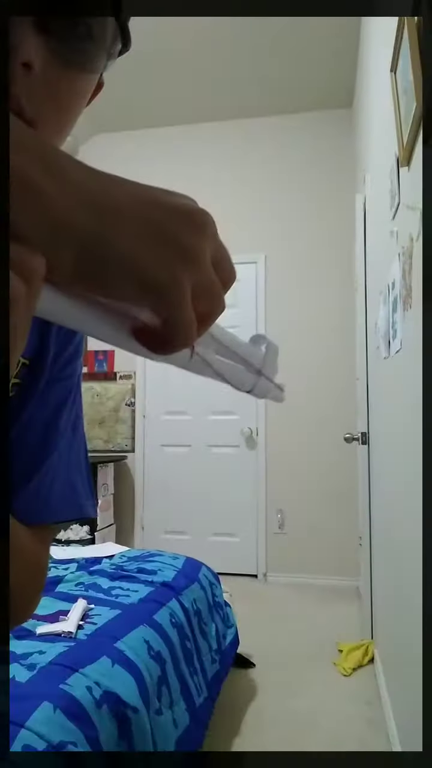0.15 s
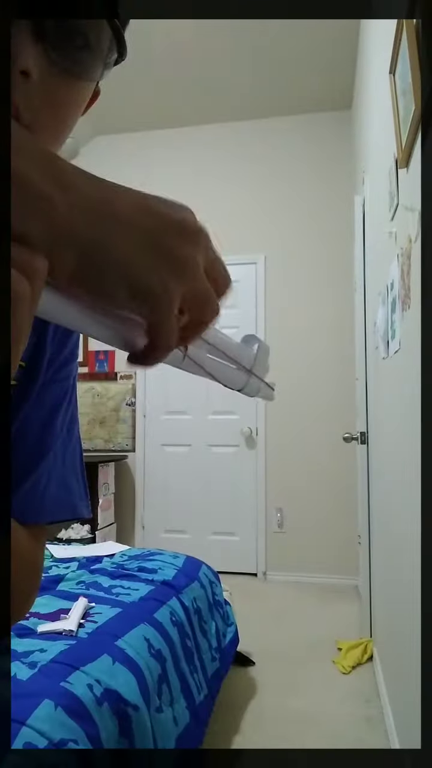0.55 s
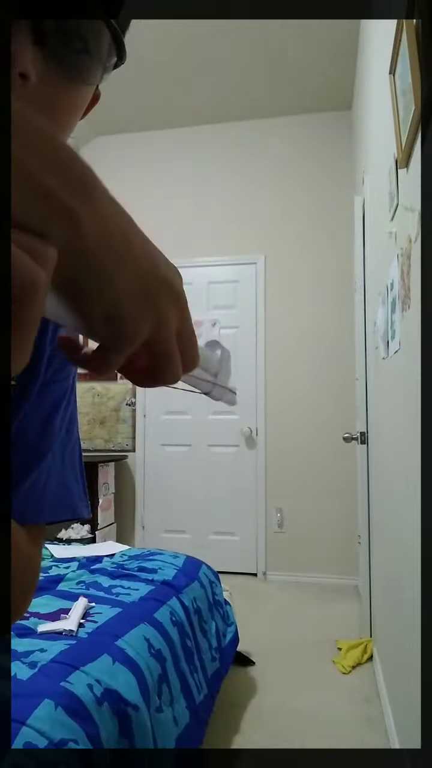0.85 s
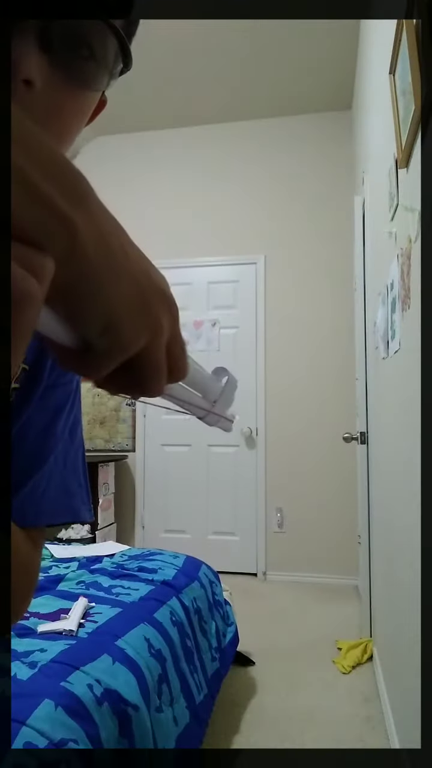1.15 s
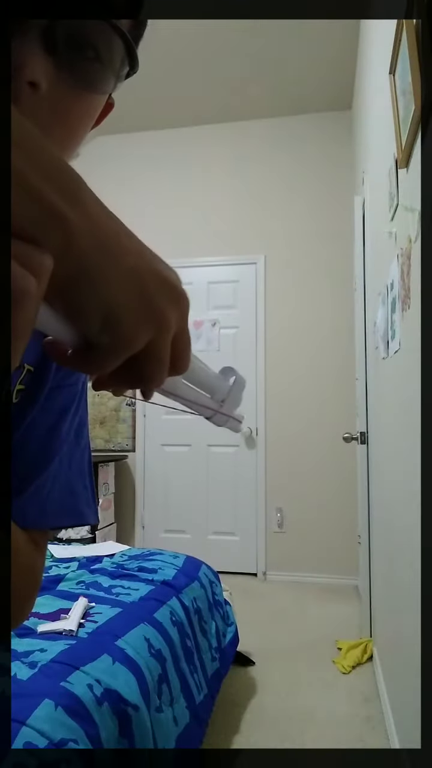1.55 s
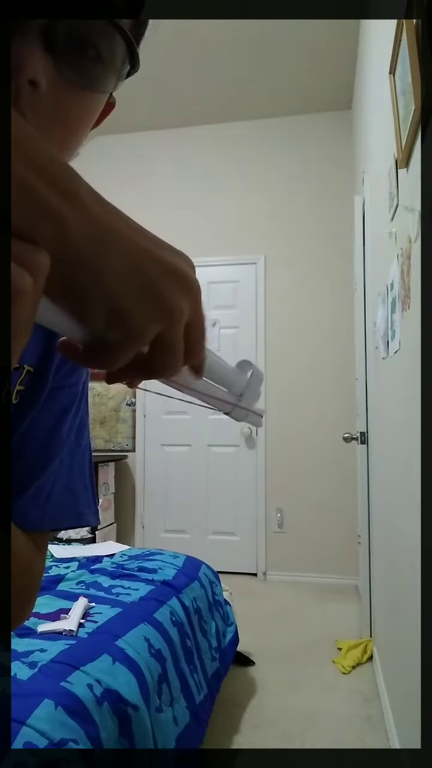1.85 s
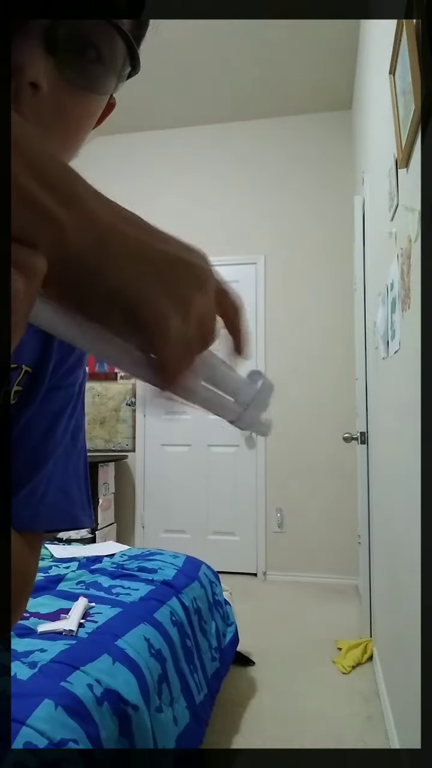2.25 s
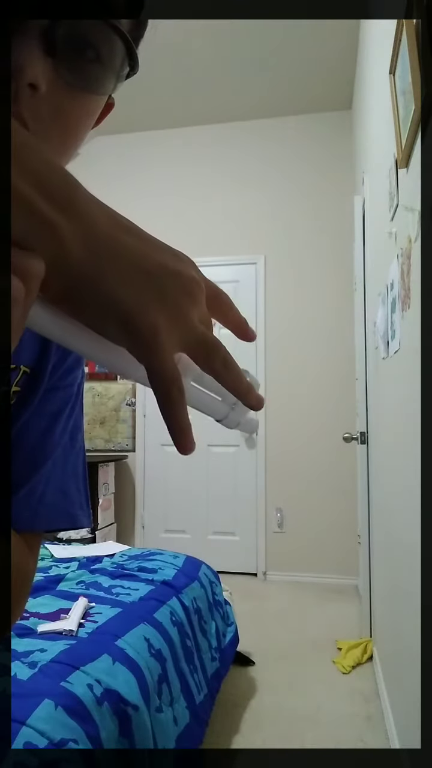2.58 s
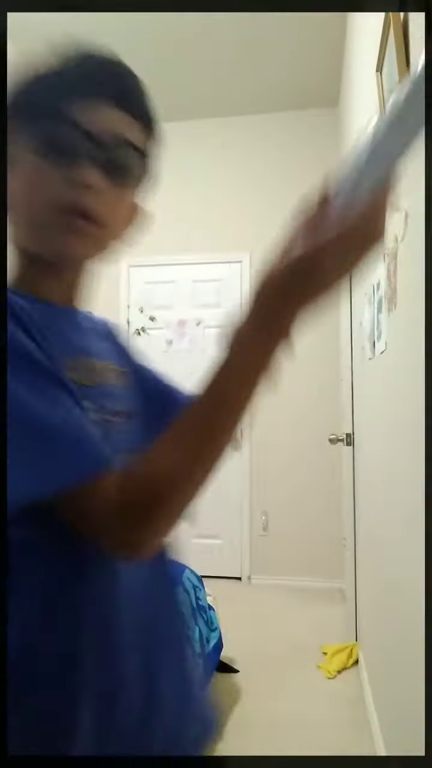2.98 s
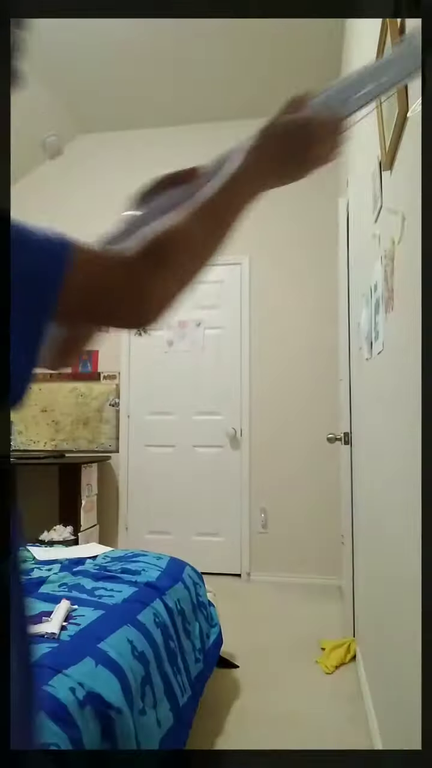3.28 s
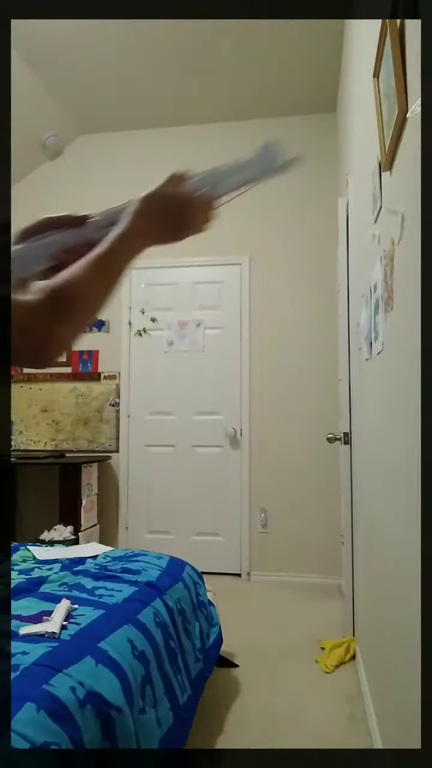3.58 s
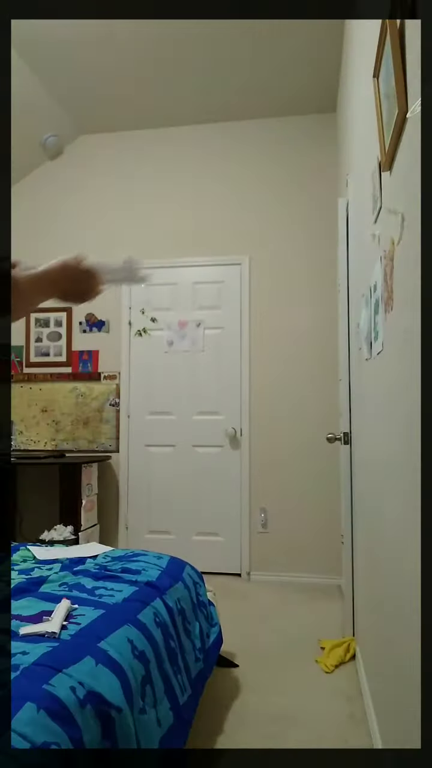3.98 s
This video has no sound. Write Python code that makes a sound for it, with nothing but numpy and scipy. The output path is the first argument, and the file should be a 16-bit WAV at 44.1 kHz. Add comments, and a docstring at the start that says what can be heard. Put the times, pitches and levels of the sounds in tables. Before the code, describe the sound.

Light paper clicks over a low electrical hum, then one sharp loud snap, a faint low twang, and a dull hollow thud.

```python
"""Paper rubber band gun in a humming bedroom

A rolled-paper gun is handled close to a phone while an appliance hums (sine, weak overtones) over rumble and air
(filtered noise). Paper rustles (clumped noise grains) and fingers tick the tube (noise crack, ringing modes).
The band is released with a snap (the loudest ticks); a band twangs (sinking near sine); something knocks
a hollow surface with a dull thud (low ringing modes); more paper ticks follow. Ticks and thud echo in the room."""
import sys
import numpy as np
from scipy import signal
from scipy.fft import rfft, irfft, next_fast_len
from scipy.io import wavfile
from scipy.ndimage import uniform_filter1d

SR = 44100
rng = np.random.default_rng(int(sys.argv[2]) if len(sys.argv) > 2 else 0)


def transcribe(u):
    """Save the signal u as a 16-bit wav file named by the first command-line argument.

    u: samples, shape (n,) or (channels, n), limited to [-1, 1]; the rate is SR.
    q: integer samples, one column per channel.
    """
    v = np.clip(np.atleast_2d(u).T, -1, 1)
    q = np.round(v * 32767).astype(np.int16)
    wavfile.write(sys.argv[1], SR, q)


N = 181947

# paper tube modes: f/Hz, bandwidth/Hz
TUBE_MODES = [(700, 150), (870, 162), (1100, 210), (1370, 240), (1650, 330), (2100, 260), (2550, 220)]


def gain_of(db):
    """Amplitude ratio of a level in dB."""
    return 10 ** (np.asarray(db) / 20)


def unit_rms(x):
    """Scales x to an RMS of 1."""
    return x / np.sqrt(np.mean(x ** 2) + 1e-20)


def interp_log_hz(points, hz):
    """Interpolates (f/Hz, value) rows along log frequency."""
    f, value = np.transpose(points)
    return np.interp(np.log(hz + 1), np.log(f + 1), value)


def add_at(mix, at_s, sound):
    """Adds a sound to the mix in place, cut at the end of the mix."""
    part = mix[round(at_s * SR):][:len(sound)]
    part += sound[:len(part)]


def coloured(x, colour):
    """Filters x, without phase shift, by a spectrum that is silent outside its ends."""
    size = next_fast_len(len(x))
    hz = np.fft.rfftfreq(size, 1 / SR)
    inside = (hz > colour[0][0]) & (hz < colour[-1][0])
    response = gain_of(interp_log_hz(colour, hz)) * inside
    return irfft(rfft(x, size) * response, size)[:len(x)]


def hum():
    """A mains-driven buzz: one strong wavering tone, weak steady overtones."""
    # strong tone before wavering: t/s, RMS level/dB
    hum_levels = [(0, -36), (0.34, -36.5), (0.4, -40), (0.47, -37.5), (0.55, -38.5), (0.61, -36),
                  (1.2, -37), (1.4, -38), (1.5, -35.5), (1.8, -38.5), (2.48, -35.5), (2.7, -37.5),
                  (2.78, -40.5), (2.88, -36), (2.96, -43), (3.02, -33.5), (3.09, -40), (3.5, -36),
                  (3.93, -38), (4.0, -47), (4.07, -37.5), (4.13, -35.5)]
    # overtones: multiple of the hum frequency, level re mean tone level/dB
    overtone_rows = [(2, -21.5), (3, -29.5), (4, -34)]
    hum_hz = 120.37
    waver_rms_db, waver_top_hz = 0.95, 13
    t = np.arange(N) / SR
    angle = 2 * np.pi * (hum_hz * t + rng.random())
    waver = unit_rms(sum(np.sin(2 * np.pi * (waver_top_hz * share * t + rng.random()))
                         for share in np.linspace(0.3, 1, 12)))
    tone_db = np.interp(t, *np.transpose(hum_levels))
    tone = gain_of(tone_db + waver_rms_db * waver) * np.sin(angle)
    overtones = sum(gain_of(np.mean(tone_db) + db) * np.sin(k * angle) for k, db in overtone_rows)
    return np.sqrt(2) * (tone + overtones)


def background():
    """Low rumble that swells at times, and steady air noise, both as filtered noise."""
    # rumble spectrum: f/Hz, relative level per Hz/dB
    rumble_colour = [(25, -34.5), (40, -21.5), (58, -2.5), (80, -2.5), (100, -15.5), (130, -33.5)]
    # swells of the rumble: t/s, swell/dB, time for the swell in dB to shrink to 1/e/s
    swells = [(0.0, 6, 0.19), (1.1, 0, 0.45), (2.41, 6.5, 0.13), (3.39, 9, 0.07)]
    # air spectrum: f/Hz, relative level per Hz/dB
    air_colour = [(82, -20.5), (140, -4.5), (155, -13), (233, -14), (357, -15.5), (430, -23.5),
                  (468, -23.5), (625, -26.5), (754, -30), (7240, -46.5), (8150, -56), (10600, -114),
                  (17900, -120)]
    rumble_base_db, air_db = -47.5, -52  # RMS
    t = np.arange(N) / SR
    rumble_db = rumble_base_db + sum(db * np.exp(-abs(t - s) / width) for s, db, width in swells)
    rumble = gain_of(rumble_db) * unit_rms(coloured(rng.standard_normal(N), rumble_colour))
    air = gain_of(air_db) * unit_rms(coloured(rng.standard_normal(N), air_colour))
    return rumble + air


def creases(colour, spread_db):
    """Dense tiny folds of uneven size, in fluttering clumps."""
    folds_per_s = 12000
    flutter_rms_db, flutter_s = 2.5, 0.004
    folds = rng.random(N) < folds_per_s / SR
    size = gain_of(spread_db * np.minimum(rng.exponential(1, N), 4)) * folds
    span = round(flutter_s * SR)
    clumps = unit_rms(uniform_filter1d(uniform_filter1d(rng.standard_normal(N), span), span))
    grains = gain_of(flutter_rms_db * clumps) * size * rng.standard_normal(N)
    return unit_rms(coloured(grains, colour))


def swell_db(at_s, rise_s, fall_s):
    """dB of a sound that climbs to one moment and dies away, 20 dB in each time given."""
    t = np.arange(N) / SR - at_s
    return -20 * np.maximum(-t / rise_s, t / fall_s)


def rustle():
    """A bright and a dull crumple; the dull one also passes through the tube and takes on its modes."""
    # paper rustling, and the noisy tails after the snap and the knock:
    # loudest t/s, bright level/dB, dull level/dB, 20 dB rise/s, bright 20 dB fall/s
    rustles = [(0.018, -71, -55.5, 0.061, 0.28), (0.299, -65, -57, 0.059, 0.067),
               (0.543, -53.5, -45, 0.011, 0.1), (0.713, -58.5, -50.5, 0.016, 0.088),
               (0.82, -69, -61.5, 0.13, 0.29), (1.299, -68, -65.5, 0.21, 0.09),
               (2.16, -66, -63.5, 0.12, 0.23), (2.394, -54, -45, 0.025, 0.11),
               (2.43, -40, -33.5, 0.045, 0.071), (2.48, -44, -42.5, 0.037, 0.077),
               (2.81, -57.5, -55.5, 0.022, 0.33), (2.94, -61.5, -66, 0.066, 0.074),
               (3.069, -68, -63, 0.073, 0.11), (3.17, -67, -59.5, 0.078, 0.41),
               (3.29, -63.5, -63, 0.065, 0.056), (3.332, -36.5, -31.5, 0.0027, 0.031),
               (3.363, -42.5, -29.5, 0.028, 0.11), (3.51, -54.5, -59, 0.096, 0.11),
               (3.74, -65, -57.5, 0.085, 0.21)]
    # bright creases: f/Hz, relative level per Hz/dB
    bright_colour = [(1800, -1.5), (2600, -6), (4000, -7.5), (5500, -10), (7000, -8.5), (8300, -26.5)]
    # dull creases: f/Hz, relative level per Hz/dB
    dull_colour = [(300, -6), (500, -0.5), (800, -2), (1200, -0.5), (2200, -8.5), (3000, -16)]
    dull_fall_share = 0.75  # the dull crumple dies sooner
    tube_db = 1  # through the tube, re direct
    t = np.arange(1500) / SR
    tube = sum(np.exp(-np.pi * w * t) * np.sin(2 * np.pi * f * t) * w for f, w in TUBE_MODES)
    bright = creases(bright_colour, spread_db=-5.5)
    direct = creases(dull_colour, spread_db=2.0)
    through_tube = unit_rms(signal.oaconvolve(direct, tube)[:N])
    dull = unit_rms(direct + gain_of(tube_db) * through_tube)
    out = np.zeros(N)
    for s, bright_db, dull_db, rise_s, fall_s in rustles:
        out += gain_of(bright_db + swell_db(s, rise_s, fall_s)) * bright
        out += gain_of(dull_db + swell_db(s, rise_s, dull_fall_share * fall_s)) * dull
    return out


def tick(row, noise):
    """A short slip of the paper: a bright crack, and the tube modes nearest the row's ring frequency ring on."""
    # crack spectrum before centring: f/Hz, relative level per Hz/dB
    crack_colour = [(250, -12.5), (600, -9), (1400, -7), (2200, -5), (3500, -6.5), (5000, -10), (6400, -7),
                    (7500, -9), (8300, -29.5)]
    slip_s, slip_shrink_per_db, slip_ref_db = 0.0016, 0.028, -38.5  # harder cracks slip faster
    crack_attack_s, ring_attack_s = 0.00041, 8e-4
    s, crack_db, crack_hz, ring_db, ring_hz = row
    t = np.arange(len(noise)) / SR
    decay_s = slip_s * np.exp(-slip_shrink_per_db * (crack_db - slip_ref_db))
    slip = noise * (1 - np.exp(-t / crack_attack_s)) * np.exp(-t / decay_s)
    lead = np.zeros(64)  # room for the filter's pre-ringing
    # up to 9 dB off away from the crack's centre
    colour = [(f, db - min(8 * np.log2(f / crack_hz) ** 2, 9)) for f, db in crack_colour]
    crack = coloured(np.r_[lead, slip], colour)
    # each mode starts with a random sign
    modes = np.zeros(len(t))
    for (f, w), side in zip(TUBE_MODES, noise[::-1]):
        size = np.sign(side) * gain_of(-32 * abs(np.log2(f / ring_hz)))  # 32 dB less per octave away
        modes += size * np.exp(-np.pi * w * t) * np.sin(2 * np.pi * f * t)
    ring = np.r_[lead, modes * (1 - np.exp(-t / ring_attack_s))]
    sound = gain_of(crack_db) * crack / abs(crack).max() + gain_of(ring_db) * ring / abs(ring).max()
    return s - len(lead) / SR, sound


def ticks():
    """Every touch of the tube, and the snap of the release, as slips of the paper."""
    # ticks: t/s, crack peak/dB, crack centre f/Hz, ring peak/dB, f where the tube rings most/Hz
    tick_rows = [(0.1042, -47.5, 5180, -41, 660), (0.2515, -32.5, 5100, -37, 1010),
                 (0.288, -42, 4300, -45, 2090), (0.536, -29.5, 4800, -41, 2010),
                 (0.5382, -27.5, 4200, -35.5, 990), (0.547, -52, 3270, -35.5, 715),
                 (0.558, -55, 5000, -51, 720), (0.566, -59, 4000, -42.5, 1410),
                 (0.7018, -29.5, 3950, -35.5, 1300), (0.7045, -31, 3980, -35, 1300),
                 (0.7101, -30.5, 4250, -36, 1370), (0.789, -36.5, 4600, -31.5, 1370),
                 (0.8104, -60, 4300, -46, 680), (0.8445, -47.5, 2600, -36, 690),
                 (0.851, -53, 4130, -43, 1330), (1.1049, -41.5, 4030, -50, 2020),
                 (1.188, -54, 3130, -52.5, 1600), (1.3087, -43.5, 5540, -54, 830),
                 (1.756, -59, 3960, -47, 1005), (1.7957, -45.5, 3900, -50.5, 654),
                 (2.3672, -44, 4000, -35, 1065), (2.382, -36.5, 4640, -37.5, 1220),
                 (2.3898, -35.5, 6500, -36.5, 920), (2.395, -29.5, 6300, -43, 700),
                 (2.3997, -21.5, 5530, -23, 1460), (2.4038, -4.5, 6300, -12, 1650),
                 (2.4051, -12, 5200, -18, 764), (2.409, -32, 4000, -24, 720), (2.431, -31, 4930, -29, 950),
                 (2.4619, -31, 3100, -27, 2590), (2.471, -30, 3050, -32, 2260),
                 (2.775, -45, 5100, -45, 1200), (2.8024, -40.5, 4030, -52, 2420),
                 (2.836, -35, 4100, -46, 2090), (2.89, -42.5, 3470, -46.5, 1010),
                 (3.069, -44.5, 5140, -52.5, 2070), (3.1464, -47.5, 3310, -48, 1900),
                 (3.327, -29, 3940, -27.5, 1530), (3.3333, -38.5, 3630, -19.5, 1630),
                 (3.3371, -22, 4600, -22, 1560), (3.3493, -30.5, 2500, -25, 846),
                 (3.353, -24, 2600, -26, 1460), (3.3637, -19, 3070, -15, 1085),
                 (3.367, -29.5, 2980, -13.5, 1156), (3.3831, -34, 3600, -26, 1270),
                 (3.3965, -38, 2900, -36, 1204), (3.458, -35.5, 5630, -52, 1196),
                 (3.475, -35, 6440, -46.5, 1360), (3.4897, -36.5, 4850, -46.5, 1190),
                 (3.4988, -35, 4520, -51, 2680), (3.509, -34, 5860, -46.5, 1290),
                 (3.5182, -29, 5600, -51, 2650), (3.69, -37.5, 5870, -53, 1110),
                 (3.7205, -39.5, 4620, -45, 1080), (3.7508, -52, 3700, -41, 672),
                 (3.85, -47, 4500, -48.5, 780), (3.8603, -55, 3376, -48.5, 980)]
    out = np.zeros(N)
    for row, noise in zip(tick_rows, rng.standard_normal((len(tick_rows), 1500))):
        add_at(out, *tick(row, noise))
    return out


def twang():
    """A near sine that sinks as the band slackens; its octave fades with the tautness."""
    at_s, level_db, octave_db = 2.812, -43, -7  # RMS; octave re fundamental while taut
    attack_s, hold_s, fade_db_per_s = 0.012, 0.065, 346
    taut_hz, slack_hz, slacken_s, sag_hz_per_s = 302.4, 219.4, 0.022, 230
    t, out = np.arange(SR // 5) / SR, np.zeros(N)
    taut = np.exp(-(t / slacken_s) ** 2)
    hz = slack_hz + (taut_hz - slack_hz) * taut - sag_hz_per_s * t
    angle = 2 * np.pi * np.cumsum(hz) / SR
    fade_db = fade_db_per_s * np.maximum(t - hold_s, 0)
    size = np.minimum(t / attack_s, 1) * gain_of(level_db - fade_db)
    octave = gain_of(octave_db) * np.sqrt(taut) * np.sin(2 * angle)
    add_at(out, at_s, np.sqrt(2) * size * (np.sin(angle) + octave))
    return out


def thud():
    """Soft pushes of a few ms set the low modes of the hollow surface ringing."""
    # blows: t/s, level added to every mode/dB
    blow_rows = [(3.3357, 4), (3.3522, -13), (3.3703, -7.5), (3.386, -10.5), (3.397, -12), (3.417, -22)]
    # hollow surface modes: f/Hz, relative level/dB, t60/s
    hollow_modes = [(68.2, -31.5, 0.53), (149, -21, 0.16), (178, 2, 0.046), (218, -20, 0.058),
                    (255.3, -15.5, 0.075), (309, -22.5, 0.066)]
    push_s = 0.0065
    t, out = np.arange(SR // 2) / SR, np.zeros(N)
    modes = sum(gain_of(db - 60 * t / t60) * np.sin(2 * np.pi * hz * t) for hz, db, t60 in hollow_modes)
    push = 1 - np.exp(-(t / push_s) ** 2)
    for s, db in blow_rows:
        add_at(out, s, gain_of(db) * modes * push)
    return out


def room(x):
    """Sparse taps of random sign, each band dying at its own speed."""
    # reverberation: f/Hz, t60/s
    room_decay = [(150, 0.24), (600, 0.86), (2000, 0.46), (5000, 0.22), (8000, 0.16)]
    taps = np.zeros(SR // 2)
    at = np.arange(200, len(taps) - 20, 20)
    taps[at + rng.integers(0, 20, len(at))] = rng.choice([-1., 1.], len(at))
    hz, t, bands = signal.stft(taps, SR, nperseg=256)
    decay = gain_of(-60 * t / interp_log_hz(room_decay, hz)[:, None])
    tail = signal.istft(bands * decay, SR, nperseg=256)[1]
    return signal.fftconvolve(x, tail / np.linalg.norm(tail))[:N]


def scene():
    """Sums all sources; only ticks and thud get echoes."""
    touches, blows = ticks(), thud()
    echoes = gain_of(-24.5) * room(touches) + gain_of(-19.5) * room(blows)
    return (hum() + background() + rustle() + touches + twang() + blows + echoes)[None]


def record(dry):
    """The small microphone loses the deepest bass; then the band limit of the phone."""
    bass_cut_hz, edge_hz = 42, 8220
    thin = signal.sosfilt(signal.butter(3, bass_cut_hz, "highpass", fs=SR, output="sos"), dry)
    band_limit = signal.firwin(511, edge_hz, window=("kaiser", 9), fs=SR)
    return signal.oaconvolve(thin, band_limit[None], "same")


dry = scene()
out = record(dry)
transcribe(out)
```